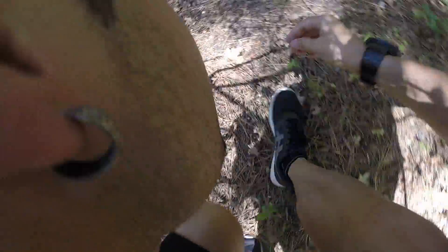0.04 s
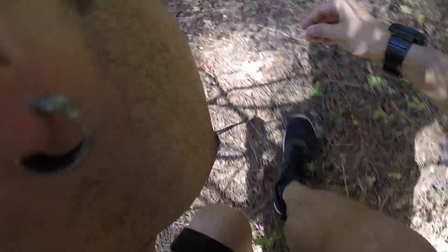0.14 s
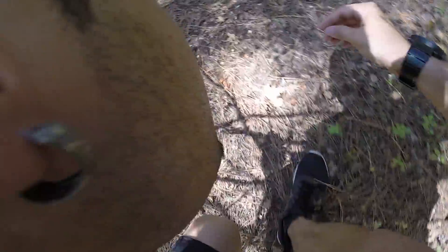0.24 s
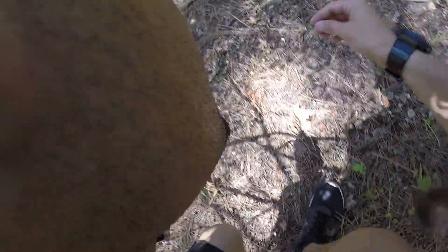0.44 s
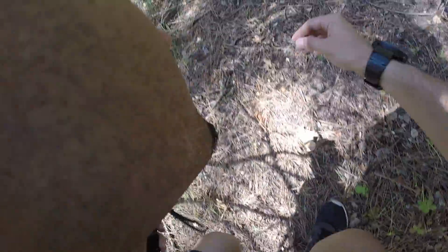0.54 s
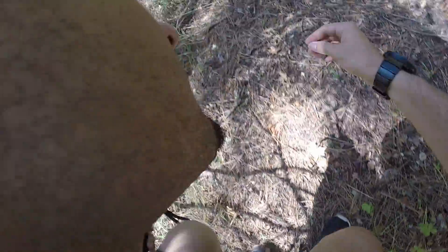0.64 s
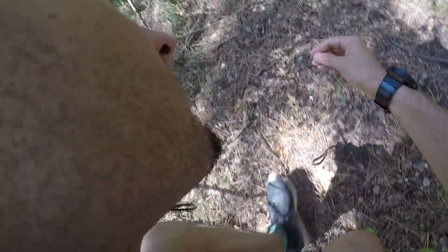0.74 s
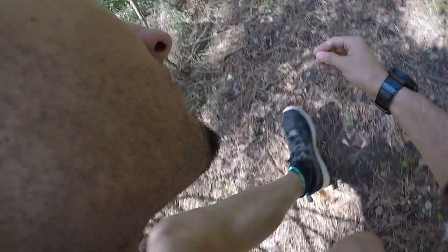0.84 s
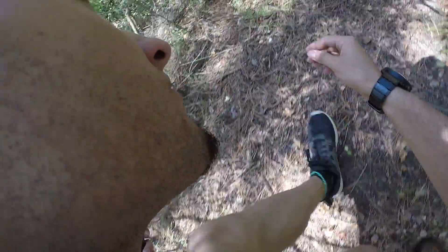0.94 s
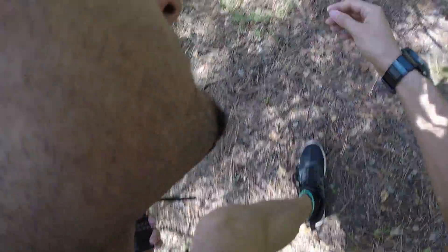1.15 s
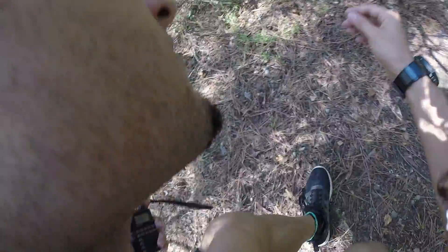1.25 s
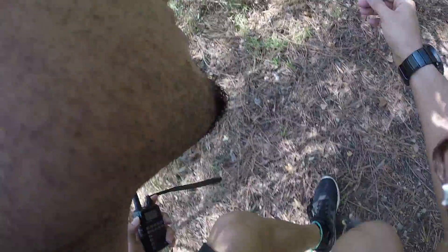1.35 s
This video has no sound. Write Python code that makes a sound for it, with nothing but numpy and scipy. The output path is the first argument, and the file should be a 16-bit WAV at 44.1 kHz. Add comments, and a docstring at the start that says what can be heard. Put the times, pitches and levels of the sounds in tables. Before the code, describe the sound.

One hard, bright, clattering crack on a body-worn camera rig overloads the microphone early on, dwarfing soft footsteps in dry needles, small twig snaps and mount knocks, over faint forest hiss and low wind.

```python
"""Throughout, there is a soft forest hiss and low wind, made of shaped noise. Soles crunch dry needles and
twigs (clouds of tiny grains) before and after one very close, hard crack at 0.21 s: a knock on the camera rig,
built from rings, clatter and thumps. Needles tick and the body-worn camera's mount knocks softly (short rings);
most twig snaps (noise bursts) follow the crack. The crack overloads: the gain control turns everything down,
then slowly lets the air and wind back up."""
import sys
import numpy as np
from scipy import signal
from scipy.fft import rfft, irfft, next_fast_len
from scipy.io import wavfile

SR = 44100
rng = np.random.default_rng(int(sys.argv[2]) if len(sys.argv) > 2 else 0)


def wrap_up_sound(samples):
    """Save the sound to the file named by the first command line argument, as 16-bit audio."""
    columns = np.atleast_2d(samples).T
    # keep every value between -1 and 1, then stretch to whole-number steps
    tamed = np.clip(columns, -1, 1)
    steps = np.round(tamed * 32767).astype(np.int16)
    wavfile.write(sys.argv[1], SR, steps)


N = 61739  # length in samples, 1.4 s

# Hiss of forest and movement: its spectrum (f/Hz, level/dB) and its loudness (t/s, level/dB)
AIR_SPECTRUM = [(70, -12.5), (140, -5.5), (450, -12), (1000, -12), (1900, -15.5), (2700, -14), (3900, -23),
                (6000, -21), (7300, -30.5), (11000, -34), (13300, -40.5), (14300, -60.5)]
AIR_LEVEL = [(0, -49.5), (.08, -50.5), (.2, -51), (.33, -55), (.42, -55.5), (.57, -55), (.75, -55),
             (.98, -52.5), (1.14, -49.5), (1.4, -52.5)]
# Slow, very deep wind gusts pushing on the microphone: spectrum (f/Hz, level/dB), loudness (t/s, level/dB)
GUST_SPECTRUM = [(5, -5), (12, 1), (25, -9.5), (45, -18), (80, -33.5), (200, -71.5)]
GUST_LEVEL = [(0, -37.5), (.08, -31), (.2, -29.5), (.35, -41), (.5, -51.5), (.68, -42), (.98, -48),
              (1.14, -30.5), (1.24, -45), (1.4, -42)]
# Wind buffeting: spectrum (f/Hz, level/dB) and loudness (t/s, level/dB)
WIND_SPECTRUM = [(20, -8), (45, 1), (66, 1), (110, -10), (220, -15.5), (450, -29.5), (1500, -61)]
WIND_LEVEL = [(0, -50), (.1, -61), (.2, -47), (.28, -27.5), (.35, -44.5), (.45, -50.5), (.58, -46.5),
              (.68, -45.5), (.8, -50.5), (.98, -49.5), (1.15, -45), (1.24, -53), (1.4, -56.5)]

# Stray needles flicking the shoe: their rings (f/Hz, level/dB, t60/s) and loudness (t/s, level/dB)
TICK_MODES = [(2600, -1.5, .016), (3080, -3, .015), (4520, -5, 0.016)]
TICK_LEVEL = [(0, -53), (.2, -55.5), (.42, -65.5), (.5, -51), (.58, -60), (.67, -37.5), (.73, -36),
              (.8, -49), (.95, -50), (1.4, -53)]
TICKS_PER_S = 81  # average, for each ring pitch

# Soles crunching the litter (t of the peak/s, rise/s, t60/s, level/dB, tilt/dB per octave)
CRUNCHES = [(.024, 0.0096, 0.17, -46.5, 3.5), (.124, 0.0053, 0.047, -47.5, 9),
            (0.159, 0.088, 0.24, -56.5, 8), (0.334, 0.013, .2, -54, 9), (0.464, 0.0088, 0.11, -39.5, -1),
            (0.511, 0.019, .3, -49.5, -1.5), (.604, .012, 0.1, -40.5, -3.5), (.633, .018, 0.1, -39.5, 0.5),
            (.6705, 0.0017, 0.049, -27, -2.3), (.703, 0.0085, 0.034, -38, -1),
            (.726, .008, 0.35, -44.5, -3.5), (.86, .09, 0.74, -52, 1.5), (1.147, 0.049, 0.23, -52.5, 0),
            (1.33, .03, 0.26, -49, -4)]
# Spectrum of the breaking litter (f/Hz, level/dB)
LITTER_SPECTRUM = [(100, -13), (600, -12), (1100, -11), (2200, -5.5), (2750, 0.5), (3150, 1), (3900, -13.5),
                   (4700, -2.5), (5400, -11), (6200, -8), (7300, -21), (11000, -25), (13200, -29.5),
                   (14500, -47.5)]
GRAINS_PER_S, GRAIN_SPREAD_DB = 9100, 4
CLUMP_DB, CLUMP_S = 2.5, 0.006  # needles break in small clumps under the sole

# Soft knocks of the mount (t/s, level/dB, dull above f/Hz, rattle level/dB)
KNOCKS = [(0.0238, -36, 1950, -25), (.1140, -26, 3400, -17), (0.262, -22, 1500, -5.5),
          (0.286, -29.5, 1900, -8), (0.2926, -28.5, 2110, -3), (0.6693, -24.5, 940, -14),
          (.6731, -18.5, 750, -9), (1.0013, -27.5, 1796, -41)]
# What the mount rings with (f/Hz, level/dB, t60/s)
MOUNT_MODES = [(190, -10.5, 0.013), (357, -21.5, 0.016), (720, -18.5, .022), (830, -6.5, .03),
               (1244, -3, .024), (1706, 0.5, 0.015), (2657, -2, .026)]
RATTLE_T60_S, MOUNT_TOP_HZ = 0.018, 3110

# Twigs snapping (t/s, level/dB, t60/s, tilt/dB per octave)
SNAPS = [(0.19, -39.5, 0.054, 4.5), (0.4239, -26, .014, -1), (0.4589, -30, 0.02, -1.5),
         (.498, -40.5, .018, 20)]
# Spectrum of a snapping twig (f/Hz, level/dB)
TWIG_SPECTRUM = [(100, -21), (600, -11), (1500, -3.5), (2800, 1.5), (4500, -5), (5700, -3), (7700, -7.5),
                 (12000, -21.5), (14000, -35)]

# Contacts of the close crack (t/s, ring level/dB, clatter level/dB, thump level/dB,
# favoured pitch f/Hz, share of the full ring length, rise/s)
CRACKS = [(0.2144, 11.5, 6.5, 5, 2300, 0.99, .0014), (0.2215, 2, -16.5, -27, 2000, 0.63, 0.00029),
          (0.2291, -8.5, 0.5, -18.5, 3070, 0.25, .0002), (0.2323, 15.5, 5.5, -12, 1697, .36, .0006)]
# What the crack rings with (f/Hz, level/dB, full t60/s)
CRACK_MODES = [(760, -20, .03), (1002, -8.5, 0.055), (1246, -13.5, .095), (1675, -2.5, .036),
               (1858.6, -49.5, 0.4), (2130, -1, 0.022), (2442, -5.5, .034), (2836, -12.5, 0.049),
               (3356, -11, 0.036), (4330, -7.5, .024), (5460, -6.5, .018), (5790, -10.5, 0.055),
               (6480, -11, .02)]
# Clatter: the bright noise burst of a hard knock on the camera rig (f/Hz, level/dB)
CLATTER_SPECTRUM = [(100, -21), (550, -24), (1100, -6), (2400, 4), (4000, 1), (6000, 4.5), (7000, -8),
                    (9800, -6.5), (11000, -20), (15000, -26)]
CLATTER_FULL_T60_S = 0.029  # each contact uses its own share of this
FAVOUR_OCTAVES = 0.55  # this far from the favoured pitch, a ring has half its strength
# The thump is a dull push, well below the ring
THUMP_HZ, THUMP_T60_S, THUMP_TOP_HZ = 227, 0.0088, 365

# Gain control: threshold, loudness averaging time, gain smoothing time, recovery speed
LIMIT_DB, SENSE_S, DUCK_S, RECOVER_DB_PER_S = -8.5, 0.0018, 0.00055, 13
CUTOFF_HZ = 15050  # top of the final sound


def amp(db):
    """Turns decibels into a gain."""
    return 10 ** (np.asarray(db) / 20)


def unit(x):
    """Scales a sound to rms 1."""
    return x / np.sqrt(np.mean(x ** 2) + 1e-20)


def level(points):
    """Turns a (t/s, level/dB) curve into a gain for every sample."""
    return amp(np.interp(np.arange(N) / SR, *np.transpose(points)))


def clock(seconds):
    """Gives the sample times of a short sound."""
    return np.arange(int(seconds * SR)) / SR


def add(mix, start, sound):
    """Mixes a sound in at a time in seconds."""
    part = mix[max(round(start * SR), 0):][:len(sound)]
    part += sound[:len(part)]


def decay(t, t60):
    """Dies away by 60 dB in t60 seconds."""
    return np.exp(-np.log(1000) * t / max(t60, 1e-4))


def ring(t, hz, t60):
    """Rings at one pitch and dies away, like one mode of a struck object."""
    return decay(t, t60) * np.sin(2 * np.pi * hz * t)


def smooth(x, seconds):
    """Follows x with a one-pole lag."""
    keep = np.exp(-1 / (seconds * SR))
    return signal.lfilter([1 - keep], [1, -keep], x)


def lowpass(x, hz):
    """Takes the treble off."""
    return signal.lfilter(*signal.butter(2, min(hz, SR / 4), fs=SR), x)


def colour(x, points, tilt_db=0):
    """Filters x by a (f/Hz, level/dB) curve, tilted per octave, and scales it to rms 1."""
    size = next_fast_len(len(x))
    hz, db = np.transpose(points)
    octave = np.log2(np.maximum(np.fft.rfftfreq(size, 1 / SR), hz[0]))
    gain_db = np.interp(octave, np.log2(hz), db) + tilt_db * octave
    return unit(irfft(rfft(x, size) * amp(gain_db), size)[:len(x)])


def noise(size, points, tilt_db=0):
    """Makes noise with a given spectrum."""
    return colour(rng.standard_normal(size), points, tilt_db)


def air():
    """A soft hiss of forest and movement, and wind pushing and buffeting the microphone: shaped noise."""
    hiss = level(AIR_LEVEL) * noise(N, AIR_SPECTRUM)
    gusts = level(GUST_LEVEL) * noise(N, GUST_SPECTRUM)
    buffeting = level(WIND_LEVEL) * noise(N, WIND_SPECTRUM)
    return hiss + gusts + buffeting


def needles():
    """Stray needles tick at random, each with one short pitched ring."""
    out, t = np.zeros(N), clock(0.04)
    for hz, db, t60 in TICK_MODES:
        flicks = rng.standard_normal(N) * (rng.random(N) < TICKS_PER_S / SR)
        out += amp(db) * signal.oaconvolve(flicks, ring(t, hz, t60))[:N]
    return level(TICK_LEVEL) * out


def soles():
    """Clouds of tiny needle fractures swell in clumps under the shoe and die away."""
    out, t = np.zeros(N), clock(0.5)
    for peak, rise, t60, db, tilt_db in CRUNCHES:
        # Many small fractures, a few much bigger
        sizes = amp(GRAIN_SPREAD_DB * np.minimum(rng.exponential(1, len(t)), 4))
        signs = rng.choice([-1, 1], len(t))
        grains = sizes * signs * (rng.random(len(t)) < GRAINS_PER_S / SR)
        clumps = amp(CLUMP_DB * unit(smooth(rng.standard_normal(len(t)), CLUMP_S)))
        lead = min(2 * rise, peak)  # the crunch starts this long before its peak
        swell = np.exp(-(np.minimum(t - lead, 0) / rise) ** 2)
        press = swell * decay(np.maximum(t - lead, 0), t60)
        add(out, peak - lead, amp(db) * press * colour(grains * clumps, LITTER_SPECTRUM, tilt_db))
    return out


def mount():
    """Jolts ring the mount and rattle it; duller ones reach mainly its low modes."""
    out, t = np.zeros(N), clock(0.08)
    for start, knock_db, dull_hz, rattle_db in KNOCKS:
        modes = np.zeros(len(t))
        for hz, db, t60 in MOUNT_MODES:
            dulling = np.hypot(1, (hz / dull_hz) ** 2)
            modes += amp(db) / dulling * ring(t, hz, t60)
        rattle = unit(lowpass(rng.standard_normal(len(t)), dull_hz)) * decay(t, RATTLE_T60_S)
        add(out, start, amp(knock_db) * (modes + amp(rattle_db) * rattle))
    return lowpass(out, MOUNT_TOP_HZ)


def twigs():
    """Breaking fibres give short bursts of noise, each dying away at its own speed."""
    out, t = np.zeros(N), clock(0.08)
    for start, db, t60, tilt_db in SNAPS:
        add(out, start, amp(db) * noise(len(t), TWIG_SPECTRUM, tilt_db) * decay(t, t60))
    return signal.sosfilt(signal.butter(8, 12500, fs=SR, output="sos"), out)


def crack():
    """Each contact on the rig gives a bright clatter, a thump and a ring favouring modes near one pitch."""
    out, t = np.zeros(N), clock(0.4)
    for start, ring_db, clatter_db, thump_db, favoured_hz, length, rise in CRACKS:
        modes = np.zeros(len(t))
        for k, (hz, db, t60) in enumerate(CRACK_MODES):
            octaves_away = np.log2(hz / favoured_hz)
            favour = 1 / (1 + (octaves_away / FAVOUR_OCTAVES) ** 2)
            modes += (-1) ** k * amp(db) * favour * ring(t, hz, t60 * length)  # signs alternate
        clatter = noise(len(t), CLATTER_SPECTRUM) * decay(t, CLATTER_FULL_T60_S * length)
        thump = lowpass(ring(t, THUMP_HZ, THUMP_T60_S), THUMP_TOP_HZ)
        contact = amp(ring_db) * modes + amp(clatter_db) * clatter + amp(thump_db) * thump
        add(out, start, contact * np.minimum(t / rise, 1))
    return out


def scene():
    """Adds up all sources, close and dry, in mono."""
    return (crack() + mount() + twigs() + soles() + needles() + air())[None]


def record(dry):
    """Gain control ducks fast and recovers slowly; what gets past it clips; then the top is cut off."""
    power_db = 10 * np.log10(smooth(dry[0] ** 2, SENSE_S) + 1e-12)
    recovery = RECOVER_DB_PER_S * np.arange(N) / SR
    # Remember the loudest moment so far, sinking steadily at the recovery speed
    held_db = np.maximum.accumulate(power_db + recovery) - recovery
    duck_db = np.maximum(held_db - LIMIT_DB, 0)
    ducked = dry * amp(-smooth(duck_db, DUCK_S))
    clipped = ducked / (1 + ducked ** 6) ** (1 / 6)  # bends peaks over towards full scale
    band_limit = signal.firwin(255, CUTOFF_HZ, window=("kaiser", 8), fs=SR)
    return signal.oaconvolve(clipped, band_limit[None], "same")


dry = scene()
out = record(dry)
wrap_up_sound(out)
```